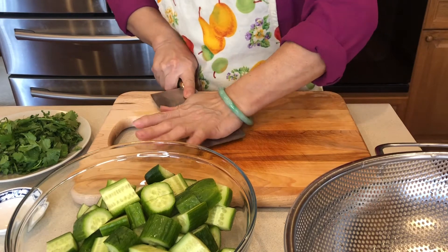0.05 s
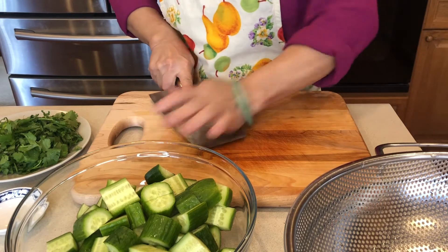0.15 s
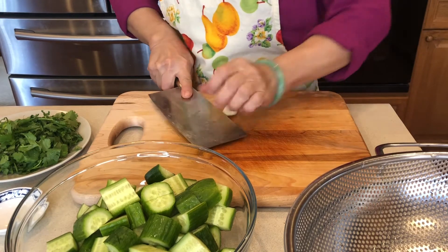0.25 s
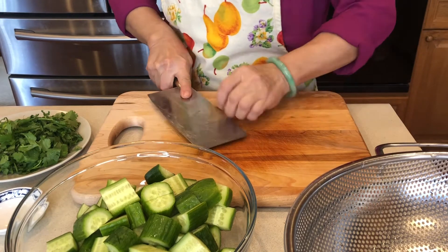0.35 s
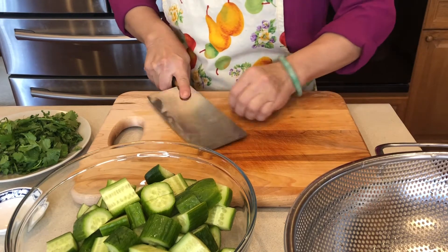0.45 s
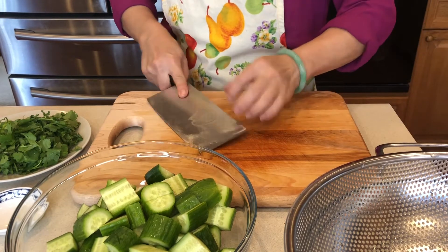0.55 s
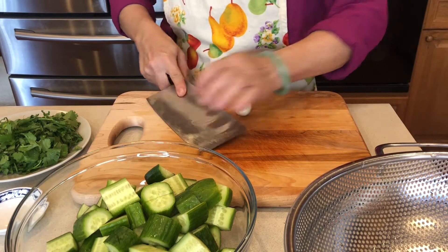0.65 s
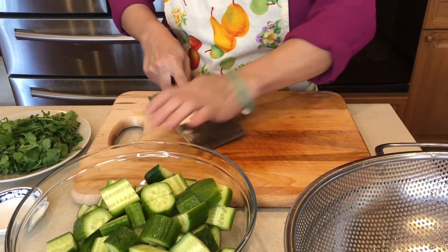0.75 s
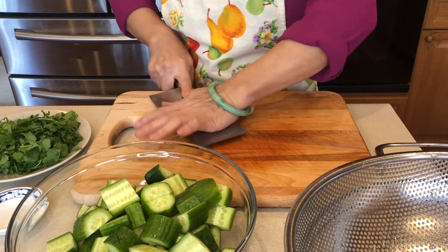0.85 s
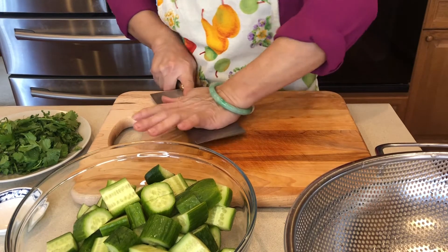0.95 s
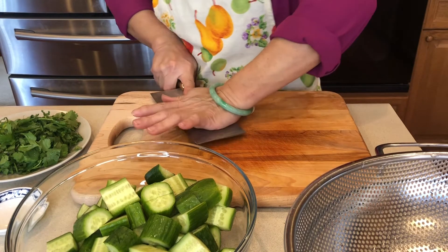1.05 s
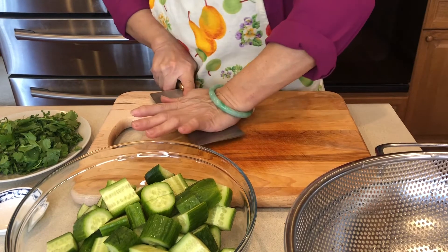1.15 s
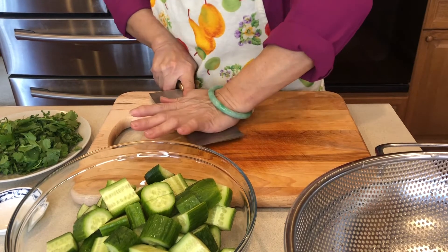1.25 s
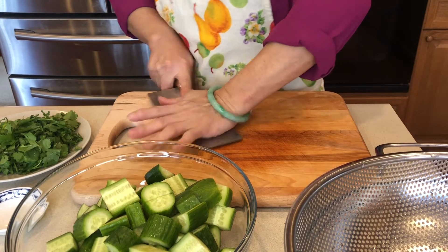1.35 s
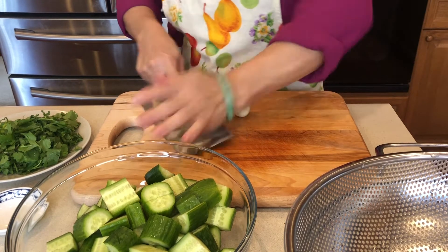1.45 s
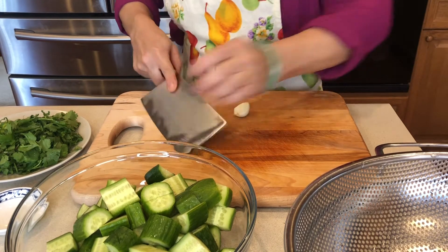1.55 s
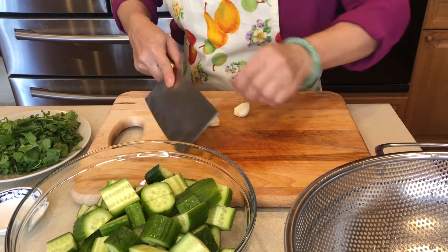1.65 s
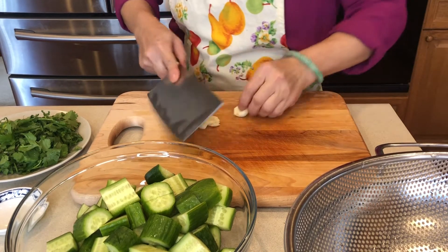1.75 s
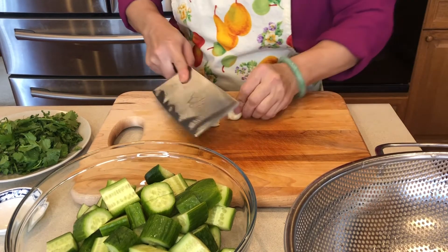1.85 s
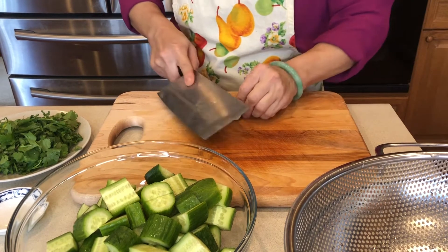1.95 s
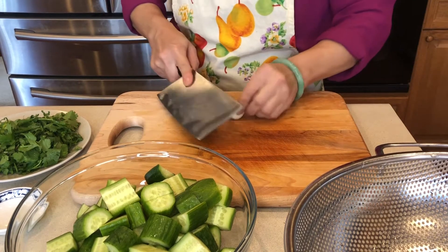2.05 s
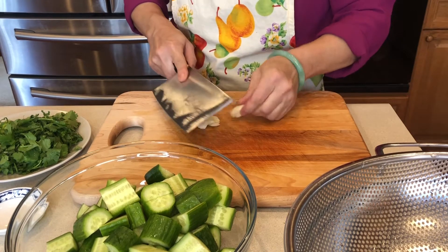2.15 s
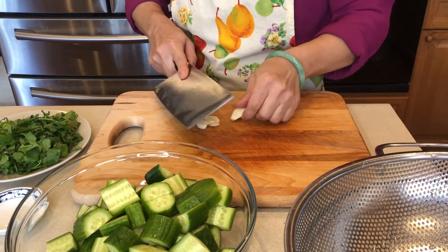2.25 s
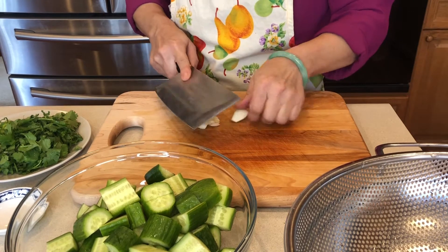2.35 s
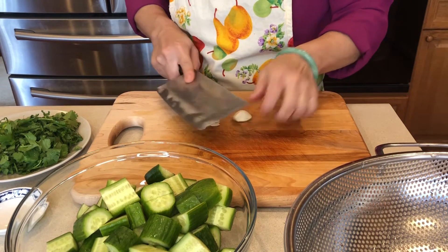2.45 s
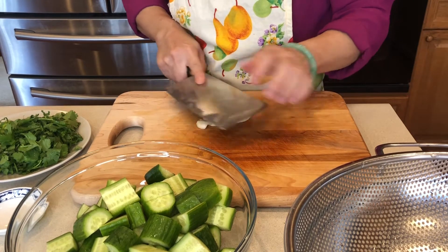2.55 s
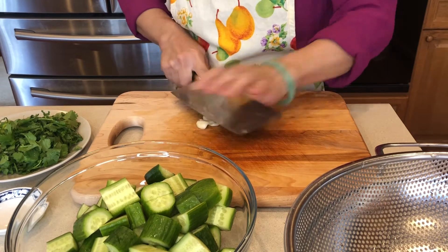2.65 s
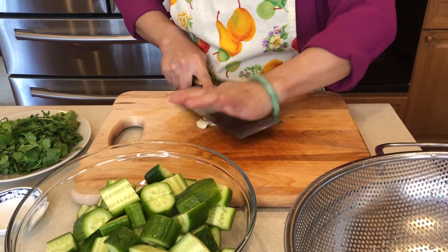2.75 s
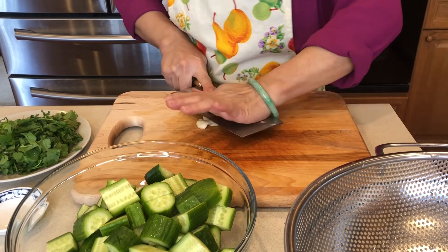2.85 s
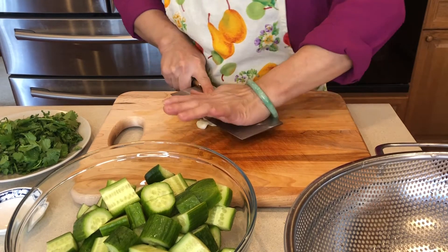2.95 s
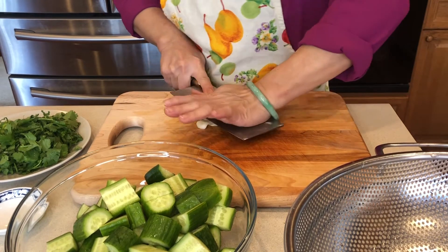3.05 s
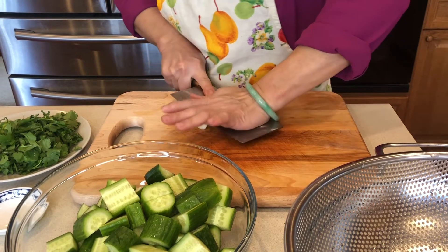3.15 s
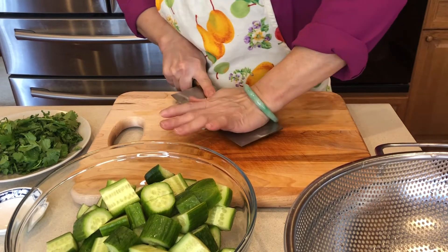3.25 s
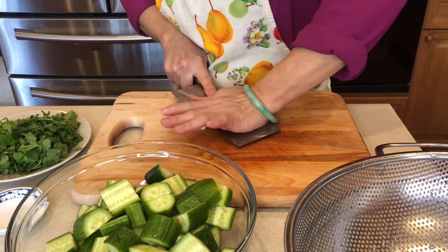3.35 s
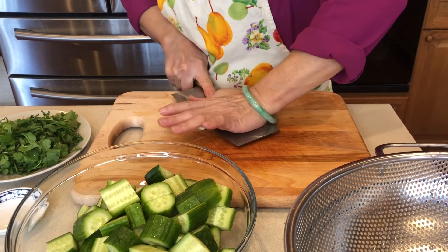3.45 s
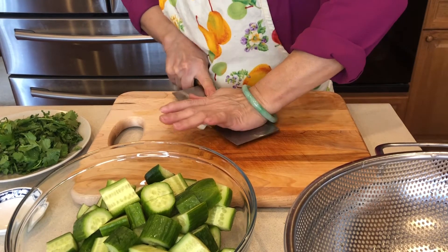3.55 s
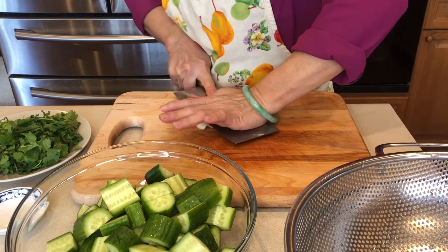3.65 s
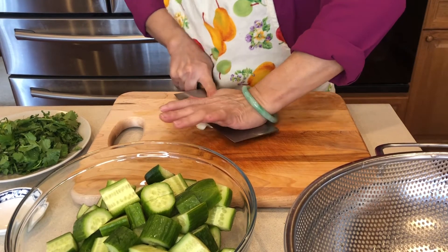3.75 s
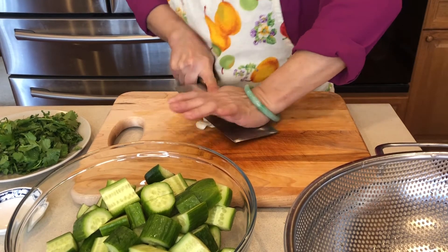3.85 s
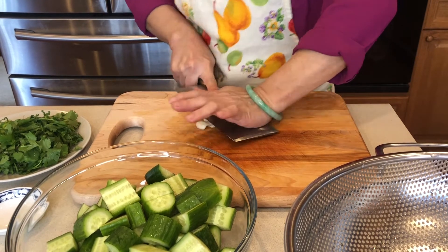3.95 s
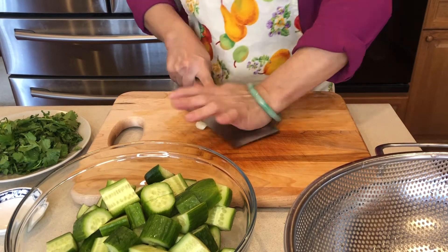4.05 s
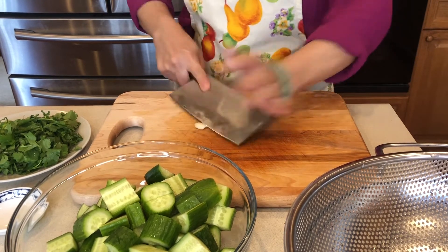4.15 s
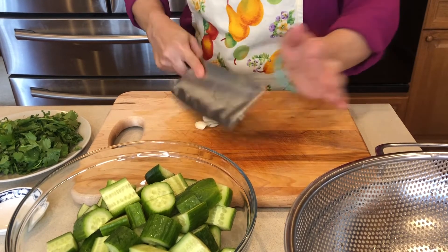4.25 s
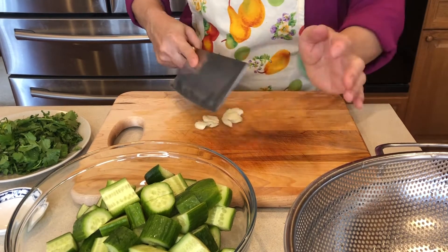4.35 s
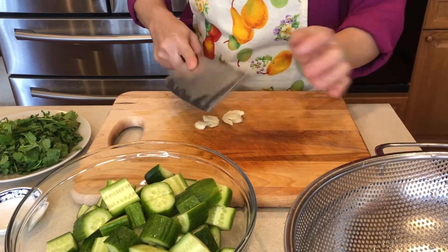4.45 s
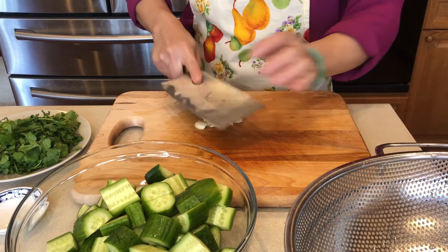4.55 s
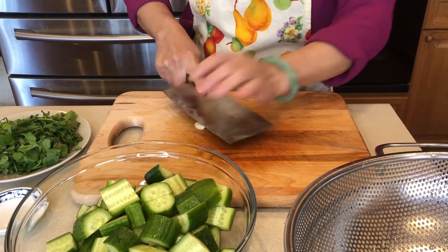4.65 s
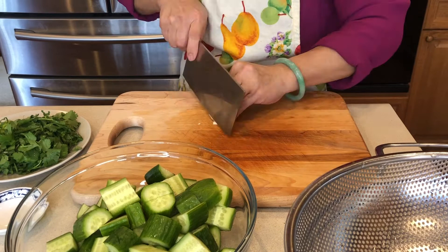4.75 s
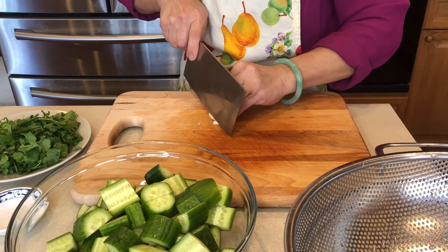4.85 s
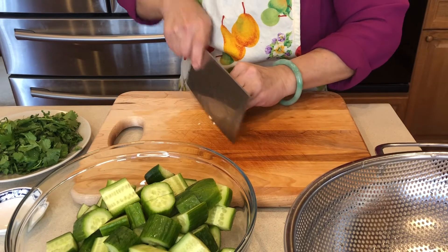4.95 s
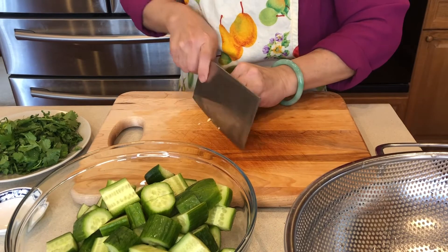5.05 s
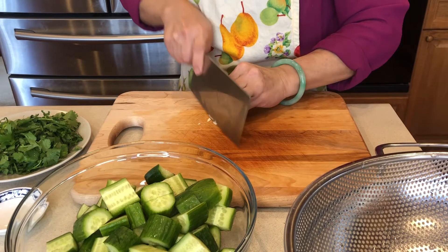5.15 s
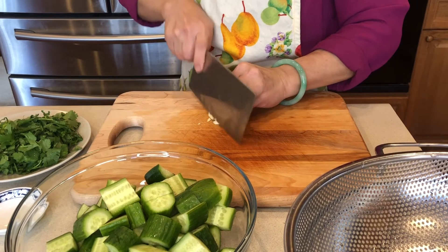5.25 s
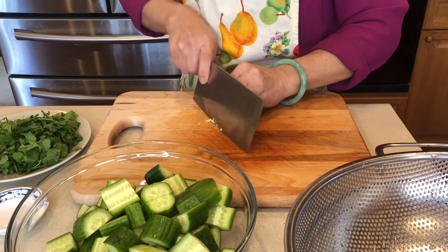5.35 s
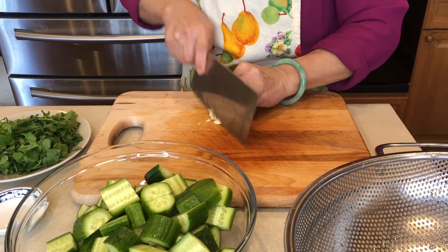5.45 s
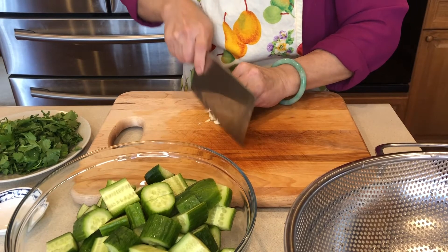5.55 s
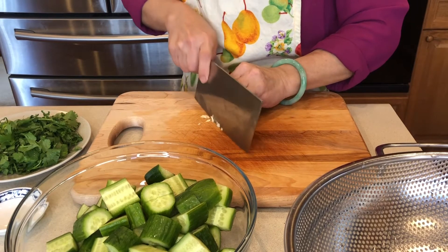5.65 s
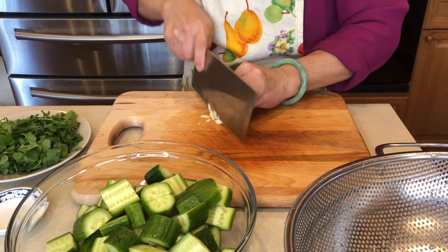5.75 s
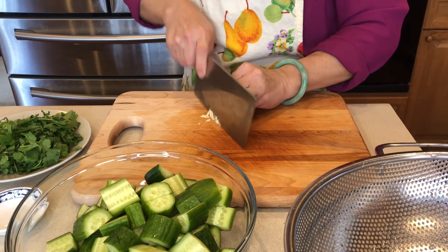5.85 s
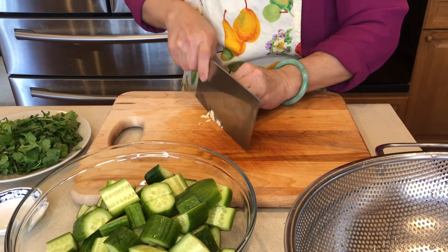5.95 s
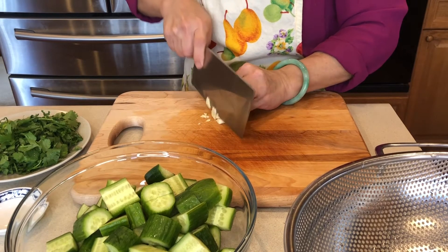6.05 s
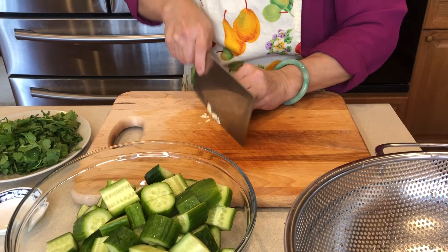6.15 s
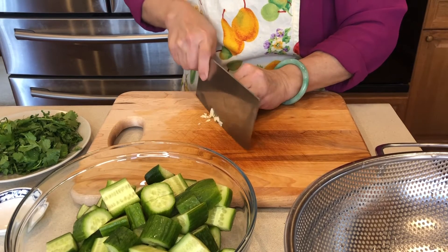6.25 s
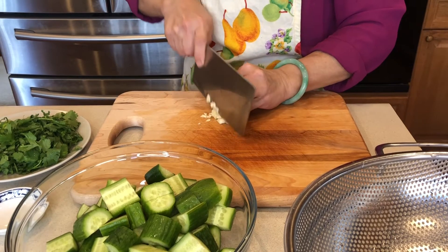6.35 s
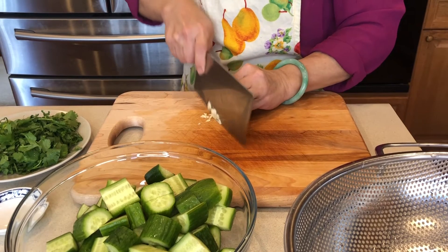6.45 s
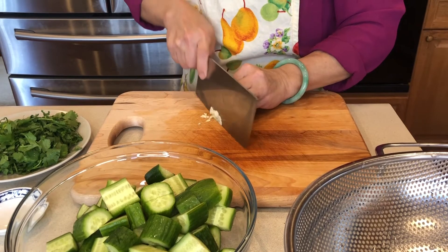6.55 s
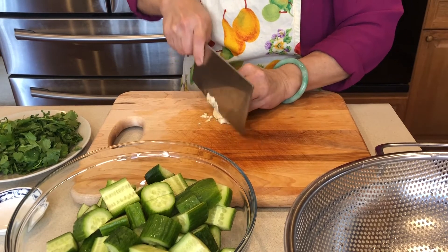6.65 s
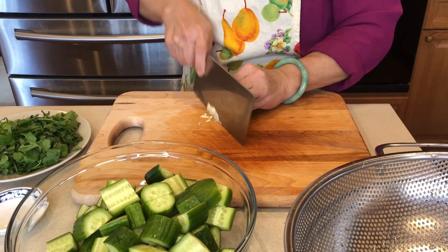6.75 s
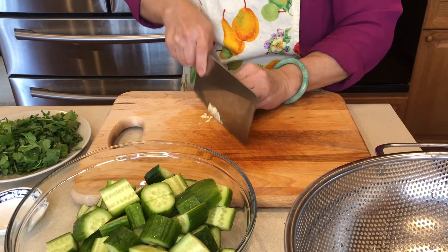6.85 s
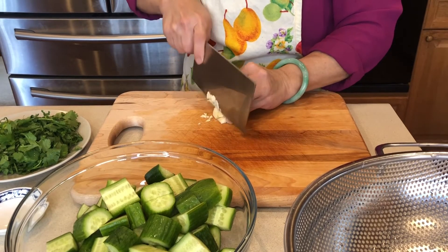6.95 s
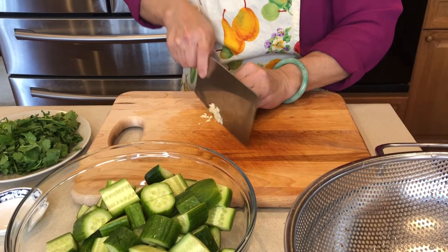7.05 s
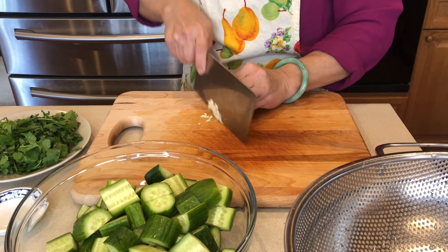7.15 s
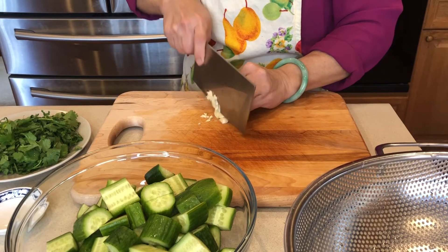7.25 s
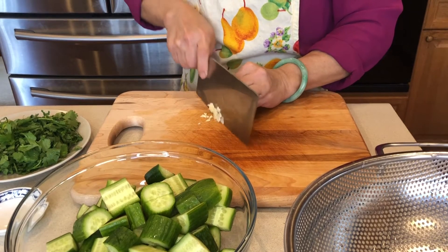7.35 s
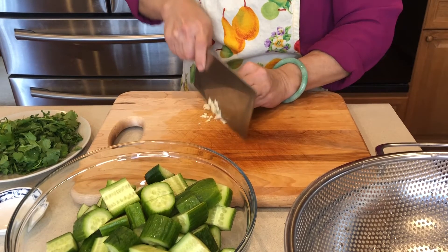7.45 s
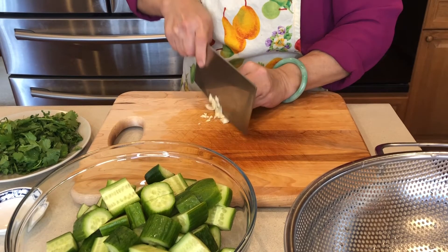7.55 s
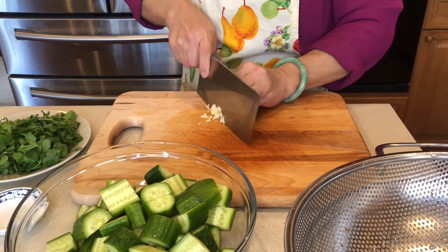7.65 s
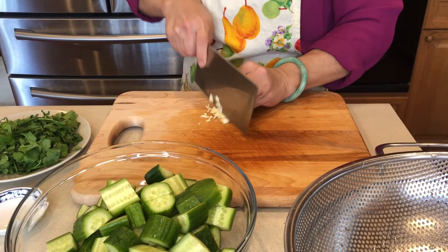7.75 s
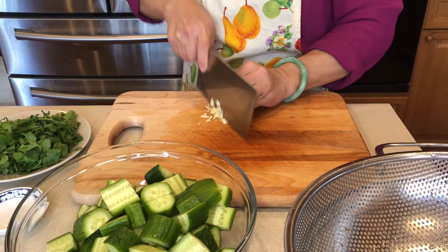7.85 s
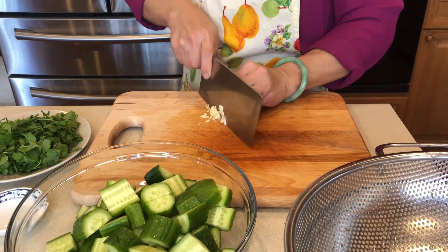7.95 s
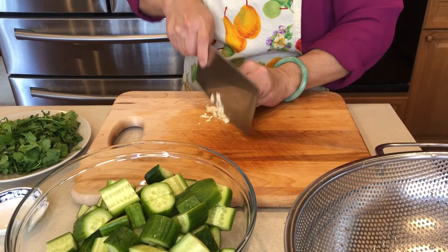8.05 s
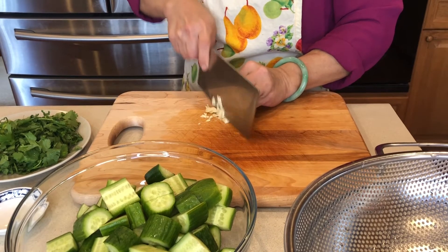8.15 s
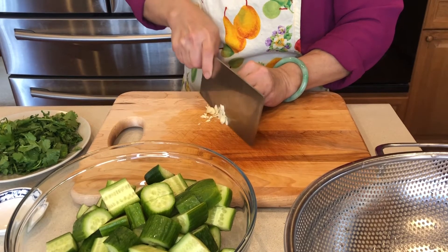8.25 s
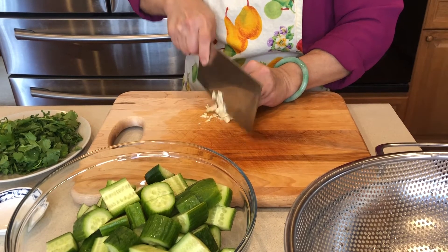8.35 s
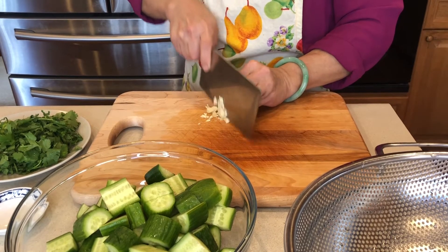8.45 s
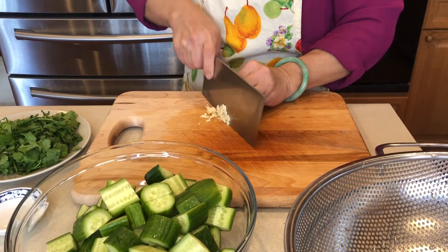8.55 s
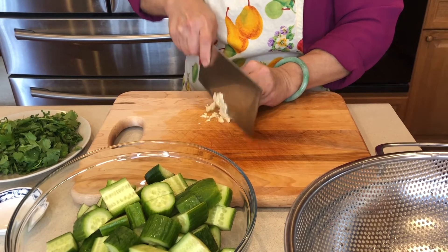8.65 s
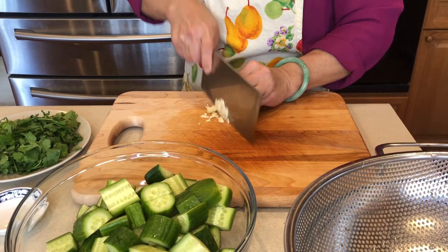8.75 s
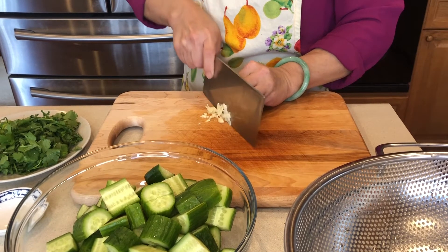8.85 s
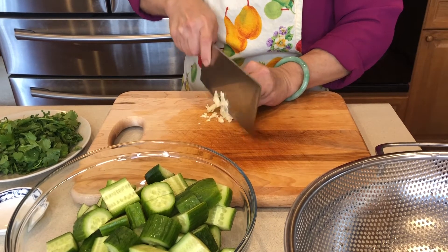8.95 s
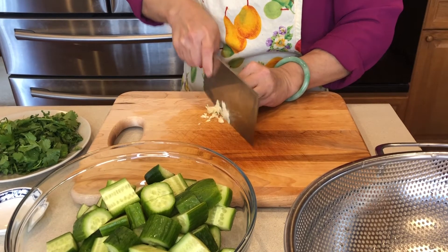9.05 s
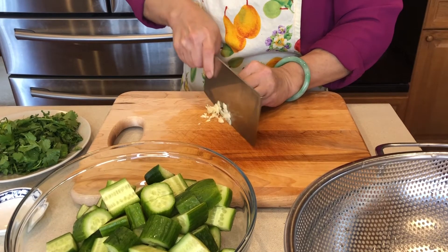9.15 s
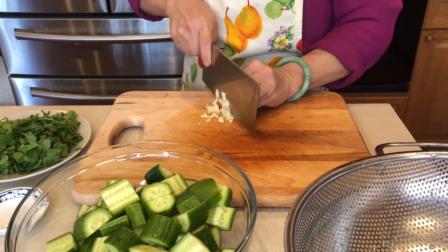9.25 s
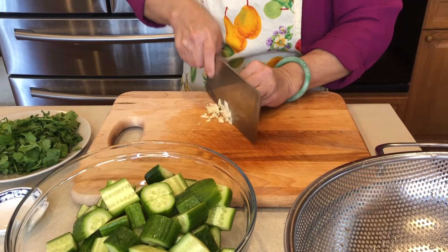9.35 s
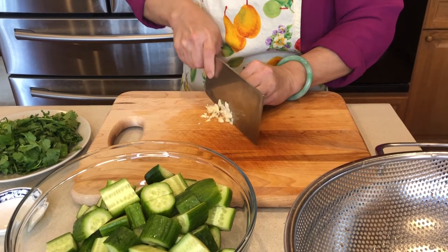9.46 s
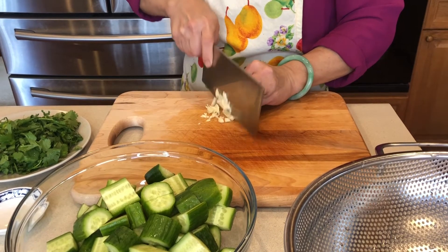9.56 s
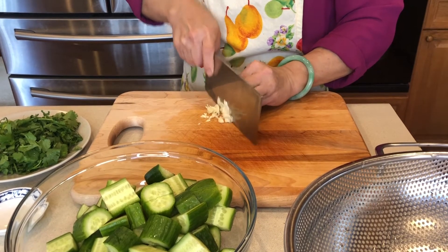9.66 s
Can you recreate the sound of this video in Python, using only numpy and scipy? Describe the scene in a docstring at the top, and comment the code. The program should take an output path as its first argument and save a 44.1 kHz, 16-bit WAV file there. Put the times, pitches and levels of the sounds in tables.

```python
"""In a quiet home kitchen a cleaver first crushes garlic cloves under its flat side, then slices them
on a thick wooden board. Each cut is a crunch through the clove, made of clicks and hiss, and a knock
on the wood; the blade and a stone bangle clink now and then. Knocks and clinks are decaying modes with
a noisy crack, board knocks also thump in the counter. Rustle and room tone are coloured noise;
near echoes and a diffuse tail give the kitchen."""
import sys
import numpy as np
from scipy import signal
from scipy.fft import rfft, irfft, next_fast_len
from scipy.io import wavfile
from scipy.ndimage import uniform_filter1d

SR = 44100
rng = np.random.default_rng(int(sys.argv[2]) if len(sys.argv) > 2 else 0)


def file_out(sig):
    """Save sig as 16-bit WAV at sys.argv[1]."""
    # one column per channel
    cols = np.atleast_2d(sig).T
    # limit, then scale
    lim = np.clip(cols, -1, 1)
    pcm = np.round(lim * 32767).astype(np.int16)
    wavfile.write(sys.argv[1], SR, pcm)


N = 427769
T = np.arange(SR // 3) / SR  # time axis of one blow, s

# the edge cuts through the clove and meets the board:
# knock_s, ring_peak_db, contact_ms, ring_length_factor, cut_s, crunch_db, thump_peak_db
CHOPS = [(5.284, -22.5, 0.25, 0.4, 0.039, -51, -47.5), (5.5730, -22, 0.87, 0.39, 0.042, -50, -49),
         (5.8597, -24, 1, 0.58, 0.082, -57.5, -48.5), (6.1650, -22.5, 0.56, 0.47, 0.06, -56, -49),
         (6.4682, -23.5, 0.93, 0.54, 0.077, -54, -48), (6.7482, -16, 0.19, 0.48, 0.056, -54, -47),
         (7.0393, -22.5, 1, 0.67, 0.087, -56, -47), (7.3125, -14, 0.4, 0.7, 0.056, -54.5, -42.5),
         (7.8785, -20, 0.63, 0.76, 0.089, -53, -45.5), (8.1914, -22.5, 0.95, 0.68, 0.093, -53.5, -46.5),
         (8.4965, -26, 1, 0.75, 0.11, -54.5, -46), (8.7672, -18.5, 0.35, 0.69, 0.065, -51, -45.5),
         (9.0531, -20, 0.94, 0.78, 0.061, -53, -49), (9.3566, -20, 0.64, 0.72, .095, -53, -46),
         (9.6467, -11, 0.08, 0.75, 0.023, -49, -50)]
# modes of the wooden board: pitch_hz, relative_db, t60_s (at ring length 1)
BOARD_MODES = [(152.6, -14, .12), (243, -11.5, 0.11), (358.7, 0, 0.038), (503.3, -2.5, 0.17),
               (566.9, -7.5, 0.33), (625.8, 3, 0.17), (695.4, -4.5, 0.18), (732.6, -5.5, 0.12),
               (751.4, -6.5, 0.094), (876.4, 13.5, 0.017), (1092.7, 0.5, 0.076), (1325, 0, 0.035),
               (1561, -3, 0.05), (1727, -7, 0.07), (2506, -8.5, 0.035), (2820, -10, 0.042),
               (3680, -13.5, 0.012)]


def gain_of(db):
    """Amplitude factor of a level in dB."""
    return 10 ** (np.asarray(db) / 20)


def evened(x):
    """Scales x to rms 1."""
    return x / np.sqrt(np.mean(x ** 2) + 1e-20)


def read(points, hz):
    """Reads a (Hz, value) curve along log frequency."""
    point_hz, value = np.transpose(points)
    return np.interp(np.log(hz + 1), np.log(point_hz + 1), value)


def add(mix, start_s, sound):
    """Adds a sound into the mix in place, cut at the end."""
    part = mix[round(start_s * SR):][:len(sound)]
    part += sound[:len(part)]


def coloured(x, points):
    """Filters x by a (Hz, dB) curve and scales it to rms 1."""
    size = next_fast_len(len(x))
    hz = np.fft.rfftfreq(size, 1 / SR)
    return evened(irfft(rfft(x, size) * gain_of(read(points, hz)), size)[:len(x)])


def air():
    """Room tone: coloured noise with a gentle waver."""
    # spectrum of the room tone: pitch_hz, relative_db
    spectrum = [(15, -51.5), (25, -5.5), (118, 1.5), (252, -5.5), (330, 5), (433, -6.5), (1250, -13),
                (3230, -17), (4020, -16), (4480, -15), (9850, -20), (14000, -35), (16500, -44)]
    level_db, waver_db = -74.5, 0.59
    waver = evened(uniform_filter1d(rng.standard_normal(N), 6000))
    return gain_of(level_db + waver_db * waver) * coloured(rng.standard_normal(N), spectrum)


def rumble(rows, colour):
    """Low noise that follows a (s, dB) level curve."""
    s, db = np.transpose(rows)
    level_db = np.interp(np.arange(s[0], s[-1], 1 / SR), s, db)
    noise = coloured(rng.standard_normal(len(level_db)), colour)
    out = np.zeros(N)
    add(out, s[0], gain_of(level_db) * noise)
    return out


def rustle():
    """A low rustle while the hands lean on the board."""
    # level curve: time_s, level_db
    curve = [(0.0, -79.5), (0.6, -70.5), (1.17, -71), (1.29, -69.5), (1.7, -90), (1.9, -55), (2.0, -75.5),
             (2.83, -88), (3.14, -66), (3.69, -65.5), (4.07, -78), (4.6, -95)]
    return rumble(curve, [(25, -17.5), (65, -1.5), (150, 5), (300, 6.5), (700, -37), (2000, -71)])


def strokes():
    """Level of the cuts and scrapes: swell, hold to the end of the stroke, die away."""
    # the blade drags over garlic and wood without a knock: end_s, length_s, crunch_db
    scrapes = [(0.088, .12, -75.5), (1.044, .2, -76.5), (1.101, 0.036, -60.5), (1.606, 0.11, -74.5),
               (3.184, 0.091, -60), (3.887, 0.29, -73.5), (4.043, 0.11, -67.5), (5.007, .12, -53.5),
               (5.201, 0.039, -67), (5.385, 0.018, -65.5), (5.952, 0.014, -63.5), (6.931, 0.038, -69.5),
               (7.504, 0.025, -67.5), (7.619, 0.12, -57.5), (7.978, .02, -66.5), (8.047, .03, -70.5),
               (8.346, 0.033, -74), (8.572, 0.024, -66), (9.239, 0.023, -69), (9.48, 0.047, -66.5),
               (9.605, 0.017, -66)]
    bite_db, bite_share, drag_t60_s = -23.5, 0.59, 0.13  # swells from bite_db over bite_share of the length
    cuts = [(s, cut_s, db) for s, _, _, _, cut_s, db, _ in CHOPS]
    out = np.zeros(N)
    for end, length, db in cuts + scrapes:
        start = max(end - length, 0)
        t = start + np.arange(SR // 2) / SR - end  # 0 at the end of the stroke
        swell = np.clip((t + length) / (bite_share * length), 0, 1)
        fade_db = -60 * np.maximum(t, 0) / drag_t60_s
        add(out, start, gain_of(db + bite_db * (1 - swell) + fade_db))
    return out


def bursts():
    """Level of the crushed cloves: a quick start and a long fade."""
    # a clove bursts under the palm and keeps crackling: start_s, crunch_db, t60_s
    crushes = [(0.307, -65, .35), (.826, -64.5, .3), (1.1, -55, .33), (1.28, -60.5, .6), (3.183, -60, .45),
               (3.284, -45.5, .35), (3.455, -57, .3), (3.52, -62, .5)]
    rise_s = 0.0024
    out, t = np.zeros(N), np.arange(SR // 2) / SR
    for s, db, t60 in crushes:
        add(out, s, gain_of(db - 60 * t / t60) * (1 - np.exp(-t / rise_s)))
    return out


def crunch():
    """Fibres break in clumps, a hail of uneven clicks over a wet hiss that also stirs the steel."""
    # colour of the breaking fibres: pitch_hz, relative_db
    fibres = [(88, -31), (150, 0.5), (566, -3), (759, -14), (1040, -3), (2180, -18.5), (2500, -9.5),
              (3100, -18), (3620, -14), (8070, -14.5), (11000, -18.5), (16000, -39)]
    # steel singing under the scrape: pitch_hz, width_hz, level_db (re fibres)
    whisper = [(3843, 300, -16), (4720, 100, -18.5), (5685, 45, -17.5), (6810, 90, -20), (8400, 120, -23)]
    clicks_per_s = 1200
    stroke_low_db, crush_low_db = -6.5, 3  # weight of the lows

    clumps = gain_of(3.7 * evened(uniform_filter1d(rng.standard_normal(N), 180)))
    click_size = gain_of(3.2 * np.minimum(rng.exponential(1, N), 5))
    clicks = click_size * (rng.random(N) < clicks_per_s / SR) * rng.choice([-1, 1], N)
    hiss = rng.standard_normal(N)
    rub = evened(clumps * (0.6 * evened(clicks) + 0.81 * hiss))

    hail = coloured(rub, fibres)
    for hz, width, db in whisper:
        hail = hail + gain_of(db) * evened(signal.lfilter(*signal.iirpeak(hz, hz / width, SR), rub))
    low = signal.sosfilt(signal.butter(2, 2800, fs=SR, output="sos"), hail)
    cut = strokes() * (hail + (gain_of(stroke_low_db) - 1) * low)
    crushed = bursts() * (hail + (gain_of(crush_low_db) - 1) * low)
    return cut + crushed


def strikes(events, modes, crack_hz, crack_db, crack_s, swell, split, steep, land_s=.0001):
    """Blows ring modes as close beating pairs, a long contact fewer high ones, over a short noisy crack."""
    # swell: rise as a share of t60; split: spread of a pair as a share of its pitch
    # steep: loss of highs with contact time; crack_s: time constant; crack_db: re ring peak
    hz, mode_db, t60 = np.transpose(modes + modes)
    edges_hz = np.clip(crack_hz, 50, SR / 2.1)
    band = signal.butter(3, edges_hz, "bandpass", fs=SR, output="sos")
    out = np.zeros(N)
    for s, peak_db, contact_ms, lasting, *_ in events:
        # each blow's mode levels and pitches vary a little at random
        level_draw, pitch_draw = rng.standard_normal((2, len(hz)))
        contact_loss = (1 + (hz * contact_ms / 1000) ** 2) ** steep
        weight = gain_of(mode_db + 1.5 * level_draw) / contact_loss
        turns = (hz * (1 + split * pitch_draw))[:, None] * T
        age = T / (lasting * t60[:, None])  # long-ringing modes also take longer to swell
        ring = weight @ (gain_of(-60 * age) * (1 - np.exp(-age / swell)) * np.sin(2 * np.pi * turns))
        ring = ring * (1 - np.exp(-(T / land_s) ** 2))

        crack = signal.sosfilt(band, rng.standard_normal(len(T)) * np.exp(-T / crack_s))
        crack = signal.lfilter(*signal.butter(2, min(1000 / contact_ms, SR / 2.1), fs=SR), crack)
        blow = ring / abs(ring).max() + gain_of(crack_db) * crack / abs(crack).max()
        add(out, s, gain_of(peak_db) * blow)
    return out


def thumps(events, upper_db):
    """The counter answers each blow with a slow-starting low note."""
    deep_hz, upper_hz, t60_s, rise_s = 68, 135, 0.21, 0.0072
    deep = np.sin(2 * np.pi * deep_hz * T)
    upper = gain_of(upper_db) * np.sin(2 * np.pi * upper_hz * T)
    note = (deep + upper) * gain_of(-60 * T / t60_s) * (1 - np.exp(-T / rise_s))
    out = np.zeros(N)
    for s, *_, thump_db in events:
        add(out, s, gain_of(thump_db) * note / abs(note).max())
    return out


def bumps():
    """Hand, clove or flat blade bumps the board: a dull knock and a thump."""
    # start_s, ring_peak_db, contact_ms, ring_length_factor, thump_peak_db
    events = [(0.020, -41.5, 0.79, 0.11, -74), (0.338, -55.5, 0.16, 0.96, -54.5),
              (0.697, -48.5, 0.96, 1, -55.5), (0.828, -38.5, 0.077, 0.76, -50),
              (1.094, -41, 0.11, 0.77, -46), (1.301, -54, 0.97, 1, -73), (1.354, -44.5, 1, 0.22, -47),
              (1.696, -48.5, 0.7, 0.81, -60), (2.166, -56.5, 0.64, 0.5, -68.5),
              (2.362, -50, 0.82, 0.64, -77), (2.39, -54.5, 0.94, 0.87, -81),
              (2.452, -56.5, .5, 0.58, -83.5), (2.658, -45, 0.48, 1, -43.5), (3.258, -38, 0.33, 0.39, -63),
              (3.293, -29.5, 0.08, .5, -42.5), (3.459, -45, 0.3, 0.78, -86), (3.52, -32, 0.25, 0.36, -69),
              (3.671, -35.5, 0.89, 0.34, -54), (3.814, -35.5, 0.34, 0.32, -54.5),
              (4.264, -60, 0.28, 0.93, -85.5), (4.898, -53.5, 0.64, 1, -81), (4.949, -38.5, 1, 0.48, -51)]
    knocks = strikes(events, BOARD_MODES, (400, 1200), crack_db=-4.5, crack_s=0.0023,
                     swell=0.053, split=0.028, steep=3.9)
    return knocks + thumps(events, upper_db=1.0)


def pings():
    """Faint single pings of steel as the blade is brushed: one dying partial each, softly started."""
    # start_s, level_db (before the soft start), pitch_hz, t60_s
    events = [(0.307, -56, 3934, 0.15), (.306, -67, 4040, 0.2), (0.305, -58.5, 8100, 0.043),
              (0.335, -55.5, 2600, 0.076), (3.043, -66, 1900, 0.19), (3.044, -46, 5610, 0.044),
              (5.173, -71, 4750, 0.35), (5.179, -69, 6550, 0.26), (5.383, -62, 6800, 0.048)]
    out, rise_s = np.zeros(N), 0.00067
    for s, level_db, hz, t60 in events:
        envelope = gain_of(level_db - 60 * T / t60) * (1 - np.exp(-T / rise_s))
        add(out, s, envelope * np.sin(2 * np.pi * hz * T))
    return out


def snaps():
    """Skins and cloves snap: milliseconds of noise in a wide band, with a fizz after it."""
    # start_s, peak_db, centre_hz
    events = [(0.3056, -52, 3900), (0.6723, -58, 6970), (1.0884, -51, 5440), (1.0962, -31.5, 4400),
              (1.2832, -40.5, 7000), (2.89, -42, 5000), (3.1197, -47, 4470), (3.1386, -54, 3980),
              (3.1532, -38.5, 4030), (3.181, -33.5, 4500), (3.2832, -28.5, 4380), (3.304, -41, 6450),
              (3.4216, -53, 4500), (3.4602, -31, 4200), (3.5235, -30.5, 3330), (3.7613, -57, 3700),
              (3.906, -51.5, 6500), (3.984, -61.5, 3500), (4.671, -47.5, 3890), (5.096, -52.5, 4710),
              (5.1861, -58, 6530), (5.269, -39.5, 3700), (5.383, -56, 6820), (5.5192, -37, 4780),
              (8.801, -47, 2546), (9.0744, -46, 7000)]
    out, t = np.zeros(N), T[:3000]
    shape = np.exp(-t / 0.0016) + 0.15 * np.exp(-t / 0.0059)
    for s, peak_db, hz in events:
        band = [(hz / 6, -18), (hz / 1.8, -4), (hz, 0), (hz * 1.8, -6), (hz * 3, -30)]
        snap = shape * coloured(rng.standard_normal(len(t)), band)
        add(out, s, gain_of(peak_db) * snap / abs(snap).max())
    return out


def taps():
    """The lifted blade is tapped and its steel modes ring freely."""
    # start_s, ring_peak_db, contact_ms, ring_length_factor
    events = [(.4265, -31, 0.18, 0.56), (1.354, -27.5, .12, 0.39), (3.043, -39.5, 0.039, 0.17)]
    # modes of the free blade: pitch_hz, relative_db, t60_s (at ring length 1)
    blade_modes = [(1010, -5.5, 0.038), (1637, -7, 0.22), (2180, -2.5, 0.074), (2480, -18, 0.15),
                   (2810, -5.5, 0.084), (3555, -6.5, 0.093), (4000, -6, 0.085), (4260, -10, 0.23),
                   (4550, -12, 0.19), (5474, -16.5, 0.19), (5911, -15, .1), (6530, -19.5, 0.11),
                   (7070, -16, 0.054)]
    return strikes(events, blade_modes, (1500, 8000), crack_db=-5.5, crack_s=0.004,
                   swell=0.0019, split=0.0026, steep=0.95)


def raps():
    """The blade's corner raps the wood: a hard knock with its own set of modes."""
    # start_s, ring_peak_db, contact_ms, ring_length_factor
    events = [(1.8245, -14.5, 0.11, 0.59), (2.6865, -15.5, 0.37, 0.87)]
    # modes under the corner: pitch_hz, relative_db, t60_s (at ring length 1)
    corner_modes = [(260.8, -26, 0.13), (570, -11, .04), (811, -9.5, 0.034), (1046, -1, 0.031),
                    (1376, -3, 0.07), (1519, 0, 0.11), (1610, -12.5, 0.095), (1868, -9.5, 0.06),
                    (2428, -6, .04), (2860, -5, 0.06), (3280, -11, 0.022), (4500, -25.5, 0.026),
                    (5570, -29, 0.19)]
    return strikes(events, corner_modes, (700, 3300), crack_db=-7, crack_s=0.0029,
                   swell=0.035, split=0.034, steep=0.45)


def clinks():
    """The bangle clinks on the steel under the palm: stone and pressed blade ring together."""
    # start_s, bangle_ring_peak_db, contact_ms, ring_length_factor, blade_ring_peak_db
    events = [(2.7, -12.5, 0.02, 0.71, -43), (2.7570, -21.5, 0.051, 0.42, -33.5),
              (4.0645, -13.5, 0.075, 0.47, -24.5)]
    # modes of the stone bangle: pitch_hz, relative_db, t60_s (at ring length 1)
    bangle_modes = [(5410, 1, 0.17), (6220, -13.5, 0.072), (7230, -21, .05), (7090, -8.5, 0.035),
                    (8086, -10, 0.054), (9010, -17.5, 0.039), (9070, -13.5, 0.047), (11320, -23.5, 0.022),
                    (15060, -26.5, .035)]
    # modes of the blade pressed flat: pitch_hz, relative_db, t60_s (at ring length 1)
    held_modes = [(1570, -8, 0.38), (1806, -7.5, 0.24), (1880, -4.5, 0.11), (2380, -8, 0.086),
                  (2510, -9.5, 0.12), (3290, -18, 0.11), (3470, -18, .08), (3920, -1.5, 0.3),
                  (4240, 0, 0.509), (4600, -17.5, 0.1), (4850, -7, .05)]
    stone = strikes(events, bangle_modes, (3000, 11000), crack_db=-13.0, crack_s=0.0044,
                    swell=.003, split=.0006, steep=0.33)
    on_blade = [(s, blade_db, ms, lasting) for s, _, ms, lasting, blade_db in events]
    held = strikes(on_blade, held_modes, (1400, 5000), crack_db=2.0, crack_s=0.0026,
                   swell=0.006, split=.002, steep=.3)
    return stone + held


def shove():
    """The board shifts on the counter: a brief low rumble."""
    # level curve: time_s, level_db
    curve = [(4.67, -64), (4.686, -56), (4.712, -47), (4.764, -61), (4.79, -96)]
    return rumble(curve, [(25, -22), (60, 6.5), (140, 2), (250, -25), (600, -54.0)])


def chops():
    """The edge meets the board: the wood knocks and the counter thumps."""
    knocks = strikes(CHOPS, BOARD_MODES, (700, 4500), crack_db=-13, crack_s=0.0018,
                     swell=0.1, split=.005, steep=1.0, land_s=0.00085)
    return knocks + thumps(CHOPS, upper_db=-7)


def kitchen(x):
    """A few near echoes over sparse impulses of random sign, each band dying at its own speed."""
    # decay of the room: pitch_hz, t60_s
    decay = [(100, 0.62), (600, 0.53), (1500, 0.51), (4000, 0.36), (7000, 0.31), (10000, 0.19),
             (15000, 0.12)]
    # counter, cupboards and ceiling: delay_s, level_db (re tail of norm 1)
    echoes = [(.0045, -22.5), (0.011, -1.5), (0.0159, -11), (0.0232, -9), (.034, -19.5), (.039, -22.5)]
    impulses = np.zeros(SR)
    at = np.arange(500, SR - 20, 20)
    impulses[at + rng.integers(0, 20, len(at))] = rng.choice([-1., 1.], len(at))
    hz, t, z = signal.stft(impulses, SR, nperseg=256)
    fade = gain_of(-60 * t / read(decay, hz)[:, None])
    tail = signal.istft(z * fade, SR, nperseg=256)[1]
    tail /= np.linalg.norm(tail)
    for s, db in echoes:
        tail[round(s * SR)] += gain_of(db)
    return signal.fftconvolve(x, tail)[:N]


def scene():
    """Sums wood, steel and garlic with their room sound, the rumbles and the room tone."""
    wood = bumps() + raps() + chops()
    steel = pings() + taps() + clinks()
    garlic = crunch() + snaps()
    wet = kitchen(gain_of(-11) * wood + gain_of(-9.5) * steel + gain_of(-12.5) * garlic)
    return (wood + steel + garlic + wet + shove() + rustle() + air())[None]


def record(dry):
    """The microphone loses the deepest bass; then the band limit."""
    low_cut_hz, band_limit_hz = 48, 16100
    thin = signal.sosfilt(signal.butter(3, low_cut_hz, "highpass", fs=SR, output="sos"), dry)
    lowpass = signal.firwin(511, band_limit_hz, window=("kaiser", 9), fs=SR)
    return signal.oaconvolve(thin, lowpass[None], "same")


dry = scene()
out = record(dry)
file_out(out)
```